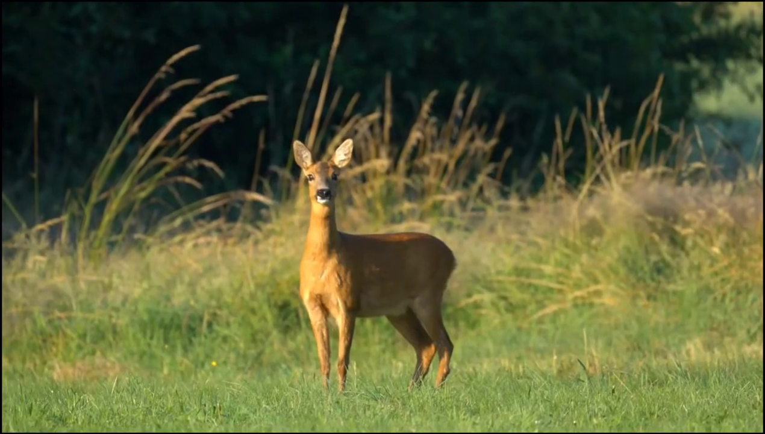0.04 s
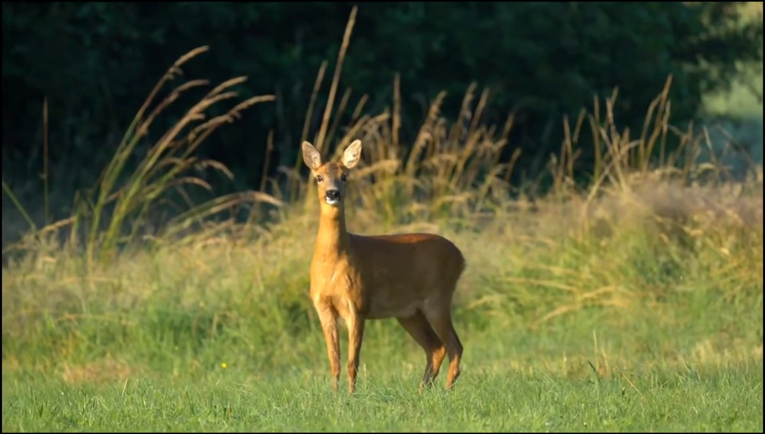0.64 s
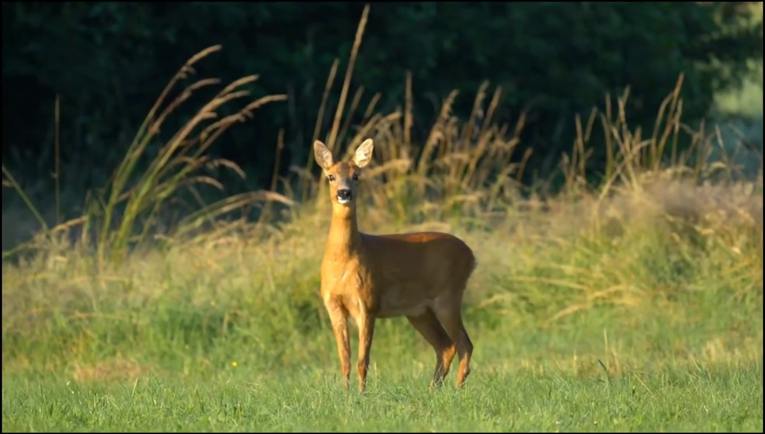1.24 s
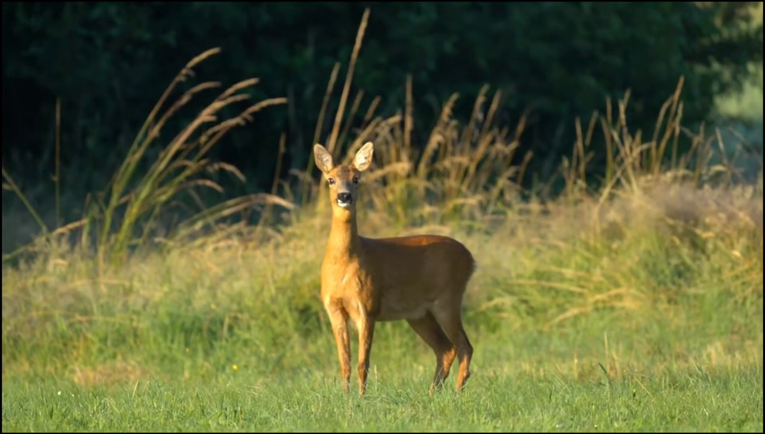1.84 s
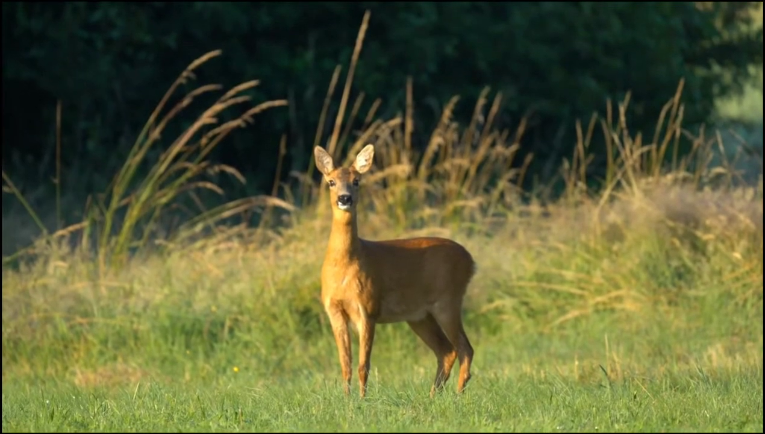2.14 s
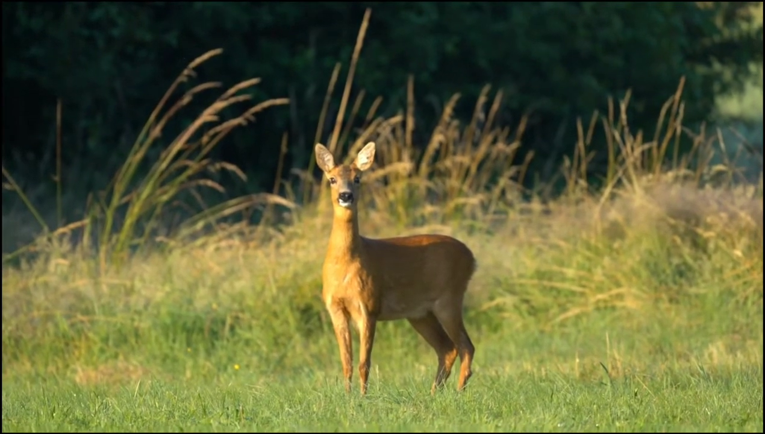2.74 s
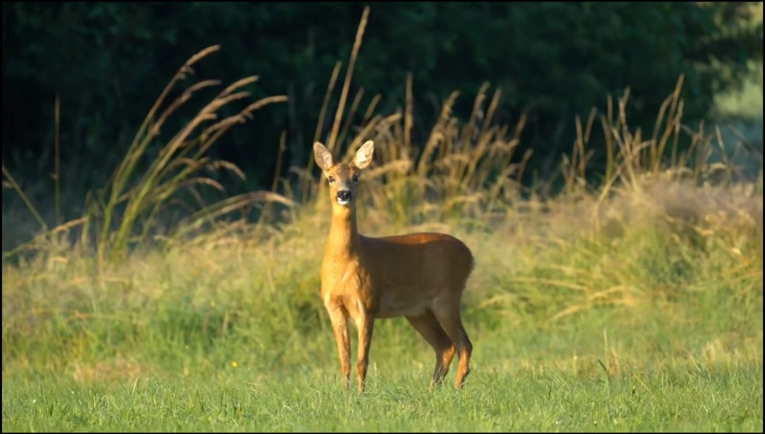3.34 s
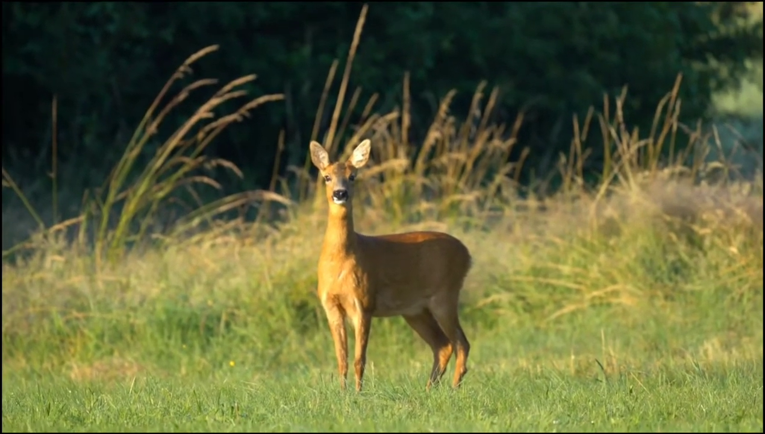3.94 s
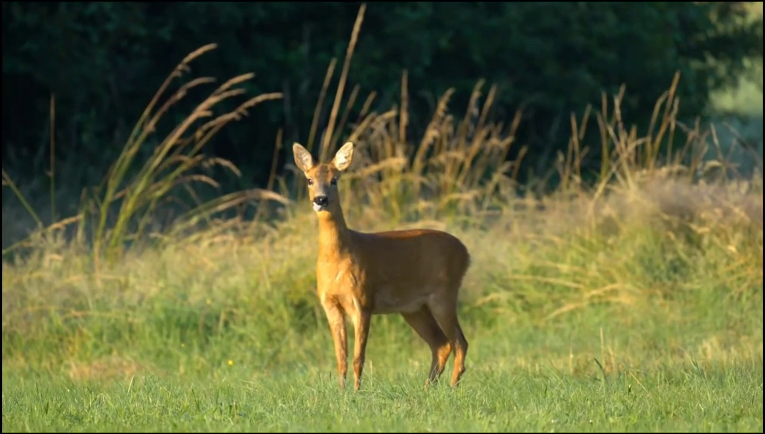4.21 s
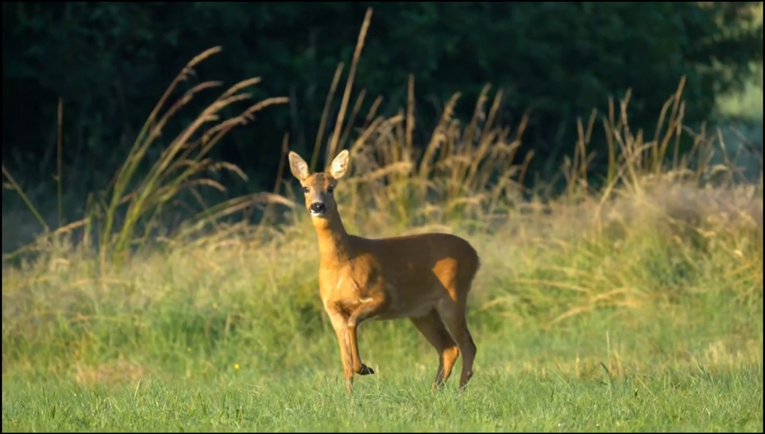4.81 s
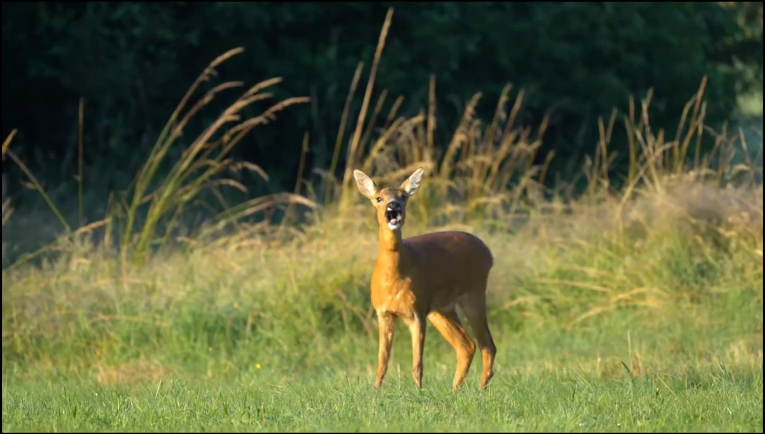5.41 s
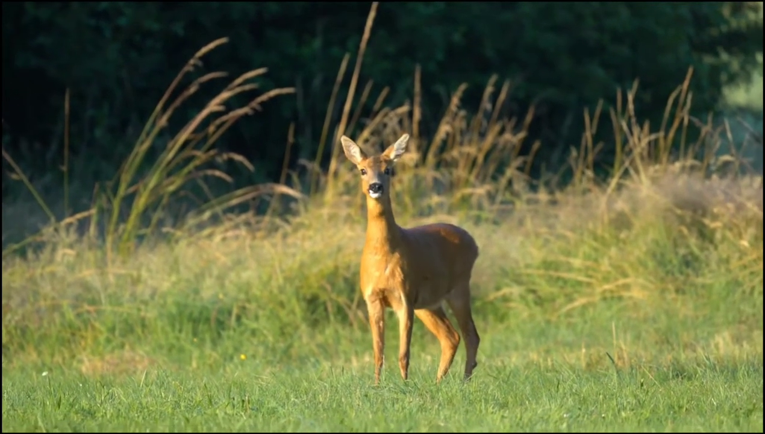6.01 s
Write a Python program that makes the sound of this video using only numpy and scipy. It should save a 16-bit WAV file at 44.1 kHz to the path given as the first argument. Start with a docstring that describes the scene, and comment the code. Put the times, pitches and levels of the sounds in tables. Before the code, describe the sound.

A quiet meadow beside a wood, with a steady soft hiss of air and a faint, wavering hum and rumble of distant traffic. From the start, small birds chirp, whistle and trill faintly, slightly blurred by the leaves. Between about 1 and 2.6 seconds one bird repeats a quick, high trilled syllable, and another gives three lower dipping calls just after 2 seconds. From 3 to 4.6 seconds come several light, thin ticks with a tiny ring, the clearest at about 3.6. The birds thin out to a few low, far chirps around 5 seconds. At 5.5 seconds a deer barks once, a hoarse, harsh, crackling burst about a third of a second long and by far the loudest sound. A dull echo from the trees lingers after it until the end, at about 6 seconds.

```python
"""Small birds whistle and trill in a meadow by a wood, over soft air noise, a far hum and light ticks.
Each bird note is a frequency-modulated tone, smeared by scattering in the leaves. Near the end a roe
deer barks once, the loudest sound: its vocal folds slap irregularly, hoarse air rushes between them,
and the resonances of throat and mouth filter both. The trees send back a long, dull echo."""
import sys
import numpy as np
from scipy import signal
from scipy.fft import rfft, irfft
from scipy.io import wavfile
from scipy.ndimage import uniform_filter1d

SR = 44100
rng = np.random.default_rng(int(sys.argv[2]) if len(sys.argv) > 2 else 0)


def store_pcm(level_fs):
    """Save levels as 16-bit WAV."""
    pcm = np.round(np.clip(level_fs, -1, 1) * 32767).astype(np.int16)
    wavfile.write(sys.argv[1], SR, np.atleast_2d(pcm).T)


N = 271806
TIME = np.arange(N) / SR
BARK_START_S, BARK_FULL_S, BARK_FADE_S, BARK_END_S = 5.517, 5.535, 5.834, 5.856


def deer(treble_hz=2400, treble_gain_db=6, flutter_db=-9, opening_s=.085, slap_gain_db=-1.6):
    """Source and filter: the folds excite the vocal tract; their hardest slaps stand out as cracks."""
    # course of the bark: time_s, effort_db, brightness_db
    bark_course = [(5.535, -33, -7), (5.633, -28.5, -3.5), (5.675, -29.5, -5), (5.689, -26, -15),
                   (5.703, -28, -6.5), (5.835, -30.5, -15)]
    # spectrum of a hard slap, broader and brighter than the voice: frequency_hz, gain_db
    slap_spectrum = [(200, -38), (450, -44), (650, -13), (1400, -2.5), (2800, 7.5), (4000, -8),
                     (6500, -28.5), (11000, -48), (15000, -65)]
    effort_db, bright_db = curves(bark_course)
    voice = vocal_tract(folds())
    body = signal.sosfiltfilt(signal.butter(2, treble_hz, fs=SR, output="sos"), voice)
    # the treble comes as the mouth opens, then brightens and dulls through the bark
    opening = ramp(BARK_FULL_S - opening_s / 2, opening_s)
    treble = undb(bright_db + treble_gain_db) * (voice - body) * opening
    # a soft, dull flutter precedes the burst
    dull = signal.sosfilt(signal.butter(2, [900, 1700], "band", fs=SR, output="sos"), voice)
    flutter = undb(flutter_db) * dull * ramp(BARK_START_S, .0011)
    burst = ramp(BARK_FULL_S - .002, .0069)
    fade = 1 - ramp(BARK_FADE_S, BARK_END_S - BARK_FADE_S)
    out = (flutter * (1 - burst) + (body + treble) * burst) * undb(effort_db) * fade
    crack = response(slap_spectrum)
    for s, db in slaps(effort_db):
        add(out, s, undb(db + slap_gain_db) * crack / np.abs(crack).max())
    return out


def folds(fold_hz=340, jitter=.55, scatter_db=3, pulse_db=-6.5, breath_db=-6.5):
    """Aperiodic phonation: the folds close at chaotic intervals while hoarse air rushes between them."""
    chance = rng.standard_normal((500, 2))
    times = BARK_START_S + np.cumsum(np.exp(jitter * chance[:, 0])) / fold_hz
    sizes = unit(undb(scatter_db * np.clip(chance[:, 1], -2, 1)))
    pulses = np.zeros(N)
    for s, size in zip(times, sizes):
        add(pulses, s, [size * np.sqrt(SR / fold_hz)])
    breath = undb(breath_db + 1.8 * walk(260)) * rng.standard_normal(N)
    return undb(pulse_db) * pulses + breath


def vocal_tract(source):
    """Resonance: the throat imposes its formants, and the open mouth adds higher ones."""
    # formant envelope of throat and mouth: frequency_hz, gain_db
    formants = [(150, -49.5), (450, -35), (600, -11.5), (720, -9), (830, -25), (980, -6.5), (1240, -6.5),
                (1470, 3.5), (1720, -2), (2050, 0), (2900, -7), (3800, -17), (6500, -31.5), (11000, -39),
                (15000, -65)]
    # high resonances of the open mouth: centre_hz, bandwidth_hz, gain_db
    mouth_modes = [(3120, 270, -5), (4600, 400, -0.5), (5520, 220, 1), (6030, 190, 7), (7210, 160, 7),
                   (8000, 180, 2), (9100, 160, 8), (10400, 440, 2), (11700, 700, 3)]
    voice = through(source, response(formants))
    return voice + sum(undb(db) * signal.lfilter(*signal.iirpeak(hz, hz / width, fs=SR), voice)
                       for hz, width, db in mouth_modes)


def slaps(effort_db, lesser_per_s=40, above_effort_db=8.5, scatter_db=2):
    """Impulsive excitation: yield (start_s, level_db) for hard slaps and lesser, unevenly spaced ones."""
    # hardest closures of the folds: start_s, level_db
    hard_slaps = [(5.5355, -26), (5.607, -16.6), (5.6259, -12.7), (5.6311, -14.6), (5.6597, -13.5),
                  (5.6687, -15.0), (5.6738, -12.3), (5.7086, -14.7), (5.7231, -15.3), (5.7532, -16.9),
                  (5.7628, -17.4), (5.7948, -17.5)]
    yield from hard_slaps
    for k, (late, size) in enumerate(rng.random((40, 2))):
        s = BARK_FULL_S + (k + late) / lesser_per_s
        if s < BARK_FADE_S:
            yield s, effort_db[int(s * SR)] + above_effort_db + scatter_db * (2 * size - 1)


def ground(x, reflection=.085, delay_s=.00142):
    """Interference: the direct sound adds to its delayed reflection off the turf."""
    return x + reflection * np.pad(x, (int(delay_s * SR), 0))[:N]


def wood(build_s=.02):
    """Reverberation: the impulse response of many trunks builds up, then fades, the treble first."""
    # spectrum of the echo: frequency_hz, gain_db
    echo_spectrum = [(200, -14), (600, 0), (1000, 0), (1500, -5.5), (2200, -10), (3000, -14.5),
                     (4200, -8.5), (9000, -28)]
    # reverberation time among the trees: frequency_hz, t60_s
    echo_decay = [(500, 2.26), (1400, 1.22), (2500, 0.98), (5000, 0.52), (10000, .4)]
    t = np.arange(2 * SR) / SR
    hz, _, grains = signal.stft(rng.standard_normal(len(t)), SR, nperseg=256)
    age = np.linspace(0, t[-1], grains.shape[1])
    fade = undb(at_hz(echo_spectrum, hz)[:, None] - 60 * age / at_hz(echo_decay, hz)[:, None])
    tail = signal.istft(grains * fade, SR)[1][:len(t)]
    h = tail * (1 - np.exp(-t / build_s))
    return h / np.linalg.norm(h)


def birds(twigs_db=-10, leaves_db=-9, near_db=-63, farness=.45):
    """Direct and diffuse sound: fainter notes come from deeper in the wood and arrive more scattered."""
    direct, scattered = np.zeros(N), np.zeros(N)
    for s, db, note in syrinx():
        add(direct, s, undb(db) * note)
        add(scattered, s, undb(db + farness * (near_db - db)) * note)
    # nearby twigs blur each note, the crowns behind let it linger
    scatter = undb(twigs_db) * foliage(t60_s=.1) + undb(leaves_db) * foliage(t60_s=.32)
    return direct + through(scattered, scatter)


def syrinx(flutter_db=.5):
    """Random modulation roughens each tone (rasp: rms share of pitch); yield (start_s, level_db, note)."""
    shake, flutter = walk(900), undb(flutter_db * walk(200))
    for s, db, rasp, (hz, swell, taper) in [*twitter(), *v_calls(), *lone_calls()]:
        span = max(int(s * SR), 0) + np.arange(len(hz))
        tone = np.sin(phase(hz * (1 + rasp * shake[span])))
        envelope = swell * flutter[span] * signal.windows.tukey(len(hz), taper)
        yield s, db, unit(tone * envelope)


def bend(length_s, pitches_hz, taper=.59):
    """Glide: (pitch, amplitude, taper) of a parabola through a start, middle and end pitch."""
    progress = np.linspace(0, 1, int(length_s * SR))
    return np.polyval(np.polyfit([0, .5, 1], pitches_hz, 2), progress), 1, taper


def trill(length_s, pitches_hz, swing_hz, rate_hz, throb=.41, taper=.26):
    """Periodic modulation: (pitch, amplitude, taper), loudest just before each trough of pitch."""
    t = np.arange(int(length_s * SR)) / SR
    turn = 2 * np.pi * rate_hz * t
    hz = np.linspace(*pitches_hz, len(t)) + swing_hz * np.cos(turn)
    return hz, 1 - throb * np.cos(turn + np.pi / 4), taper


def twitter(start_s=1.4446, period_s=.1237, count=10, opening_count=3, slur_s=.0115, rasp=.01):
    """Periodic song: a small bird repeats one syllable, a quick downslur and then a high trill."""
    # the song swells and holds: time_s, level_db
    song_level = [(1.07, -70), (1.45, -66.5), (1.8, -61.3), (2.1, -59.5), (2.56, -60.5)]
    for k in range(-opening_count, count):
        s = start_s + k * period_s
        db = np.interp(s, *np.transpose(song_level))
        if k < 0:  # it opens with slower, hoarser slurs at the same pace
            yield s + .008, db - 2.5, .035, bend(.04, (6300, 5800, 4850))
        else:
            yield s, db - 5, rasp, bend(slur_s, (6460, 6080, 5730))
            yield s + slur_s, db, rasp, trill(.058, (5232, 5014), swing_hz=190, rate_hz=79)


def v_calls(start_s=2.0625, period_s=.1138, count=3, fall_db=-56.5, rise_db=-56, rasp=.014):
    """Opposed frequency sweeps: a nearer bird calls in a V, with a fall, a short gap and a rise."""
    for s in start_s + period_s * np.arange(count):
        yield s, fall_db, rasp, bend(.01495, (3100, 2725, 2020))
        yield s + .030, rise_db, rasp, bend(.038, (1930, 2630, 3590))


def lone_calls(chip_rasp=.089, chirp_rasp=.081,
               mew_start_s=1.666, mew_hz=735, mew_sag_hz_per_s2=10000, mew_rasp=.016):
    """Pitch contours set the scattered calls apart: single gliding tones, and a mew of three harmonics."""
    # hoarse chips that plunge and level out: start_s, level_db
    chips = [(0, -63), (.075, -66.5), (.168, -64.5), (0.371, -60.5)]
    for s, db in chips:
        yield s, db, chip_rasp, bend(.04, (6700, 4720, 4090))
    # a far bird's hoarse low chirps: start_s, level_db
    chirps = [(4.73, -68), (4.957, -71), (5.112, -68.5), (5.257, -69.5), (5.393, -67)]
    for s, db in chirps:
        yield s, db, chirp_rasp, bend(.0196, (2158, 1980, 1830))
    # one nasal mew, sagging in pitch: harmonic_number, level_db, length_s
    mew_partials = [(6, -65.5, 0.12), (7, -58.5, 0.084), (8, -60.5, 0.043)]
    for harmonic, db, length in mew_partials:
        age = length * np.array([0, .5, 1])
        yield mew_start_s, db, mew_rasp, bend(length, harmonic * (mew_hz - mew_sag_hz_per_s2 * age ** 2))
    # whistled notes: start_s, length_s, start_hz, middle_hz, end_hz, level_db, rasp_share
    whistles = [(.245, 0.036, 4400, 4580, 3700, -62, .01), (.281, 0.033, 3000, 2586, 2330, -64, .07),
                (0.547, 0.18, 3990, 3140, 2690, -77, 0.067), (.798, .031, 1950, 2270, 1900, -69, .01),
                (0.821, 0.047, 1660, 1580, 1380, -72.5, .015), (.945, .049, 1300, 1440, 1550, -74.5, .01),
                (1.148, 0.05, 2200, 2034, 1820, -63, .009), (1.221, 0.073, 1746, 1810, 2010, -72, .011),
                (1.475, 0.053, 2780, 2123, 2000, -61, 0.014), (1.548, 0.027, 1640, 1620, 1510, -70, .011),
                (1.75, .097, 3860, 3430, 3200, -71.5, .03), (1.967, .022, 4300, 3930, 3660, -58.5, 0.038),
                (1.987, 0.046, 3590, 2740, 2430, -60, .079), (2.409, 0.035, 2300, 2030, 1840, -64, 0.06),
                (2.451, 0.03, 1700, 1540, 1460, -71, .01), (2.703, .02, 3000, 2630, 2050, -58.5, .01),
                (2.743, 0.04, 1900, 2034, 1790, -63, 0.013), (2.901, .024, 5500, 5830, 6100, -67.5, .012),
                (2.976, 0.034, 5850, 5850, 6170, -58.5, .011), (2.98, 0.093, 3650, 3710, 3800, -65, 0.02),
                (3.104, .03, 6900, 5380, 4630, -61.5, 0.01), (3.153, 0.098, 3050, 3230, 3260, -73, 0.032),
                (3.288, 0.047, 3600, 3650, 3610, -61.5, .02), (3.416, 0.18, 5300, 4850, 4490, -74, 0.089),
                (3.66, .048, 3710, 3490, 3270, -69.5, .025), (3.745, .085, 3800, 3376, 2980, -69.5, .035),
                (3.868, 0.039, 2550, 2740, 2940, -71.5, .012), (3.999, .12, 3880, 3630, 2833, -70, .025),
                (4.188, .045, 5780, 5100, 4650, -65.5, .02), (4.353, .026, 3750, 3880, 3660, -72.5, 0.022),
                (4.692, 0.048, 4550, 4130, 3860, -71, 0.022)]
    for s, length, start, middle, end, db, rasp in whistles:
        yield s, db, rasp, bend(length, (start, middle, end))
    # trilled notes: start_s, length_s, start_hz, end_hz, swing_hz, rate_hz, level_db, rasp_share
    trills = [(0.476, 0.057, 4850, 5080, 880, 118, -60.5, 0.045),
              (1.036, 0.071, 2380, 2420, 233, 38, -66.5, 0.012),
              (1.32, 0.073, 2090, 2320, 298, 83, -67.5, 0.0087),
              (1.374, 0.055, 2230, 3000, 314, 104, -58.5, 0.011),
              (2.596, 0.076, 2103, 2220, 151, 36, -61, 0.013)]
    for s, length, start, end, swing, rate, db, rasp in trills:
        yield s, db, rasp, trill(length, (start, end), swing, rate)


def foliage(t60_s):
    """Diffuse scattering: the leaves' impulse response is exponentially decaying noise."""
    t = np.arange(SR) / SR
    h = rng.standard_normal(SR) * undb(-60 * t / t60_s)
    return h / np.linalg.norm(h)


def ticks(ring_gain_db=-2, click_gain_db=1, click_t60_s=.004, attack_s=.0007):
    """Impact on a small hard object: a thin contact click, then a brief ring of damped modes."""
    # light strikes: start_s, ring_db, click_db
    strikes = [(3.0016, -63, -44), (3.035, -63, -58), (3.6082, -51, -41.5), (3.9794, -57.5, -66),
               (4.2454, -57.5, -48), (4.505, -64, -69), (4.527, -66, -66), (4.5436, -56.5, -68),
               (4.565, -54, -66)]
    # modes of the object: frequency_hz, gain_db, t60_s
    modes = [(1598, 2.5, 0.092), (1660, -12, 0.024), (2340, -5, 0.051), (2850, -7, 0.086)]
    out, t = np.zeros(N), np.arange(SR // 5) / SR
    ring = sum(undb(db - 60 * t / t60) * np.sin(2 * np.pi * hz * t) for hz, db, t60 in modes)
    ring *= np.minimum(t / attack_s, 1)
    scrape = rng.standard_normal(len(t)) * undb(-60 * t / click_t60_s)
    thin = response([(500, -47), (3000, -7), (10000, -18), (13000, -16), (15500, 0), (18000, -11)])
    click = through(scrape, thin)[:len(t)]
    for s, ring_db, click_db in strikes:
        add(out, s, undb(ring_db + ring_gain_db) * ring + undb(click_db + click_gain_db) * click)
    return out


def chatter(gain_db=-7, glide=.11, syllable_db=3):
    """A diffuse field: far birds twitter in quick syllables, heard only through the leaves."""
    # voices deep in the wood: pitch_hz, gain_db
    voices = [(1900, -5.5), (2900, -3), (3600, -2), (5200, -3.5), (6000, -1.5)]
    # their joint loudness: time_s, level_db
    chorus_level = [(0.0, -62.5), (0.55, -61.5), (0.85, -68.5), (1.5, -67.5), (1.75, -61.5), (3.1, -62),
                    (4.45, -63), (4.75, -70), (5.45, -85)]
    song = 0
    for hz, db in voices:
        pitch = hz * (1 + glide * walk(140))
        syllables = undb(syllable_db * np.clip(walk(22), -2, 1))
        song += undb(db) * np.sin(phase(pitch)) * syllables
    return unit(through(song, foliage(t60_s=.1))) * undb(curves(chorus_level)[0] + gain_db)


def traffic(rumble_gain_db=-5, hum_gain_db=-6, octave_db=-1, waver=.011):
    """Band noise and tone: far traffic rumbles, and random modulation blurs its hum and the octave."""
    # loudness of the rumble: time_s, level_db
    rumble_level = [(0, -69.5), (1.2, -72.5), (1.97, -68.5), (2.9, -69), (3.8, -75), (5.45, -73)]
    # the hum comes and goes: time_s, level_db
    hum_level = [(0, -68.5), (.17, -64), (.76, -82), (1.05, -67.5), (1.21, -83), (1.32, -69.5), (1.97, -64),
                 (2.5, -82), (2.9, -73.5), (3.95, -79.5), (4.22, -70.5), (5.45, -80)]
    # the hum slowly rises: time_s, pitch_hz
    hum_pitch = [(0, 434.2), (.5, 438.8), (1.3, 441.6), (2.2, 450), (3.5, 453.6), (5.4, 456)]
    rumble = noise([(100, -46.5), (300, -7.5), (600, 1), (950, -2.5), (1500, -10.5), (4000, -41)])
    rumble *= undb(curves(rumble_level)[0] + rumble_gain_db + walk(5.5))
    turn = phase(curves(hum_pitch)[0] * (1 + waver * walk(70)))
    hum = np.sin(turn) * undb(2 * walk(14)) + np.sin(2 * turn) * undb(octave_db + 2 * walk(14))
    return rumble + hum * undb(curves(hum_level)[0] + hum_gain_db)


def air(level_db=-65):
    """Stationary broadband noise: still air and a faint hiss."""
    # spectrum of the noise floor: frequency_hz, relative_density_db
    air_spectrum = [(25, -37), (48, -29), (64, -9), (85, -18.5), (233, -13.5), (457, -6.5), (826, -7.5),
                    (1570, -10), (1950, -9.5), (3000, -13), (5880, -13), (7500, -13), (15500, -15)]
    return noise(air_spectrum) * undb(level_db)


def undb(db):
    """Decibels to amplitude ratio."""
    return 10 ** (np.asarray(db) / 20)


def unit(x):
    """Scale to rms 1."""
    return x / np.sqrt(np.mean(x ** 2))


def phase(hz):
    """Phase in radians is the integral of frequency."""
    return 2 * np.pi * np.cumsum(hz) / SR


def ramp(start_s, length_s):
    """A raised-cosine rise from 0 to 1."""
    return np.sin(np.pi / 2 * np.clip((TIME - start_s) / length_s, 0, 1)) ** 2


def curves(table):
    """Linear interpolation of each later column over the first, time_s."""
    s, *columns = np.transpose(table)
    return [np.interp(TIME, s, c) for c in columns]


def at_hz(points, hz):
    """Interpolate (frequency_hz, value) points on a log-frequency axis."""
    f, value = np.transpose(points)
    return np.interp(np.log(np.maximum(hz, 1)), np.log(f), value)


def response(points, size=4096):
    """Minimum-phase impulse response of a (frequency_hz, gain_db) spectrum, with unit energy."""
    cepstrum = irfft(np.log(undb(at_hz(points, np.fft.rfftfreq(size, 1 / SR)))))
    cepstrum[1:size // 2] *= 2
    cepstrum[size // 2 + 1:] = 0
    h = irfft(np.exp(rfft(cepstrum)))
    return h / np.linalg.norm(h)


def through(x, h):
    """Convolution of a sound with an impulse response."""
    return signal.fftconvolve(x, h)[:N]


def noise(points):
    """White noise filtered to a (frequency_hz, gain_db) spectrum, at rms 1."""
    return unit(through(rng.standard_normal(N), response(points)))


def walk(rate_hz):
    """A random modulator of rms 1: levels held for 1 / rate_hz seconds and smoothed twice."""
    hold = int(SR / rate_hz)
    steps = np.repeat(rng.standard_normal(N // hold + 1), hold)
    return unit(uniform_filter1d(uniform_filter1d(steps, hold), hold)[:N])


def add(out, start_s, sound):
    """Superpose a short sound from start_s on."""
    i = max(int(start_s * SR), 0)
    out[i:i + len(sound)] += sound[:max(N - i, 0)]


def scene(echo_db=-14):
    """Superposition: the deer stands in the open before the wood; the birds sit in its foliage."""
    bark = ground(deer())
    echo = undb(echo_db) * through(bark, wood())
    return (bark + echo + birds() + chatter() + ticks() + traffic() + air())[None]


def record(dry):
    """Band limiting: a steep low-pass filter cuts the treble above 16 kHz."""
    return signal.sosfilt(signal.ellip(10, .2, 70, 16000, fs=SR, output="sos"), dry)


dry = scene()
out = record(dry)
store_pcm(out)
```